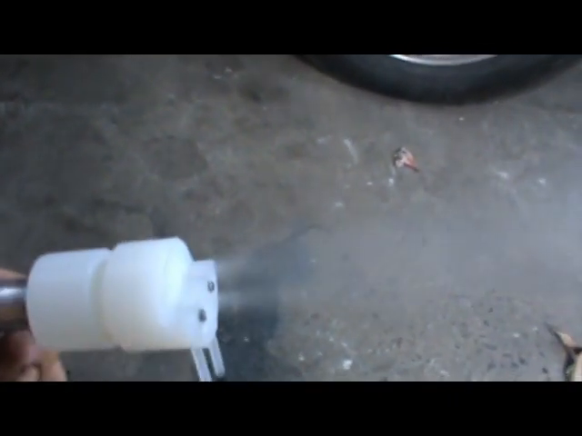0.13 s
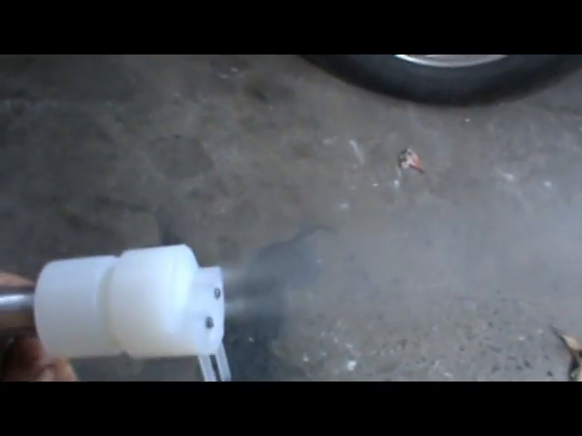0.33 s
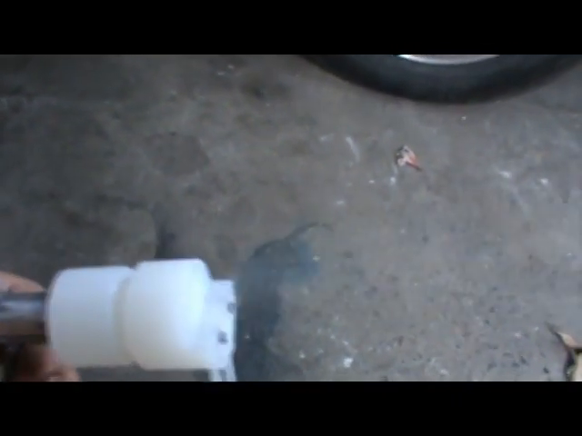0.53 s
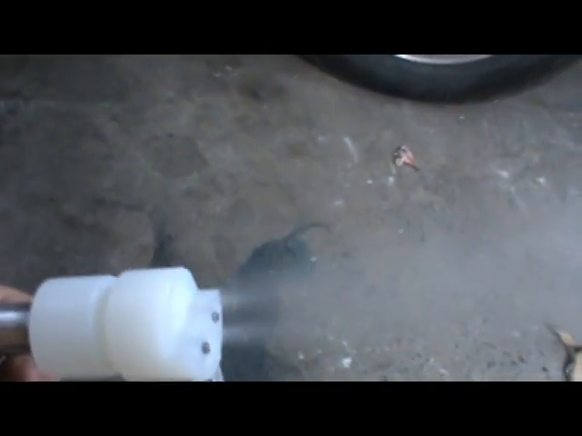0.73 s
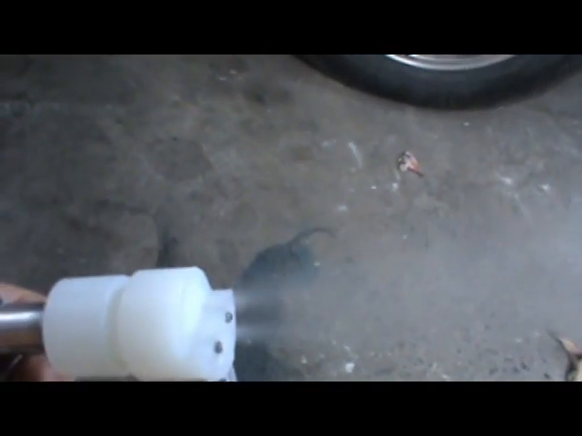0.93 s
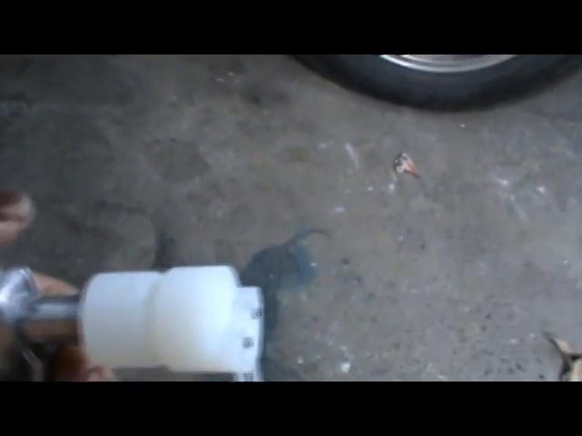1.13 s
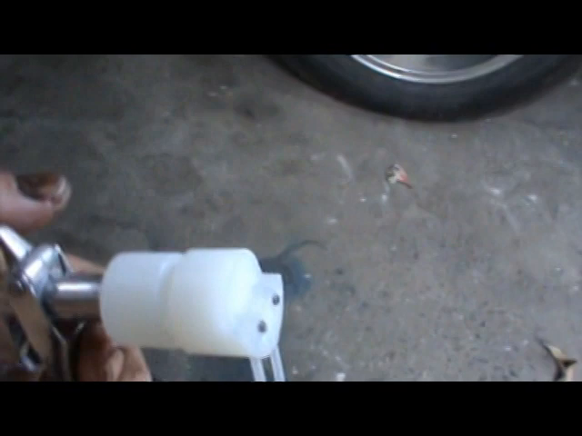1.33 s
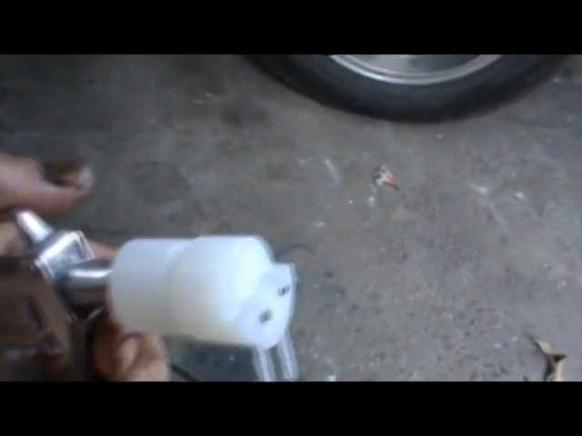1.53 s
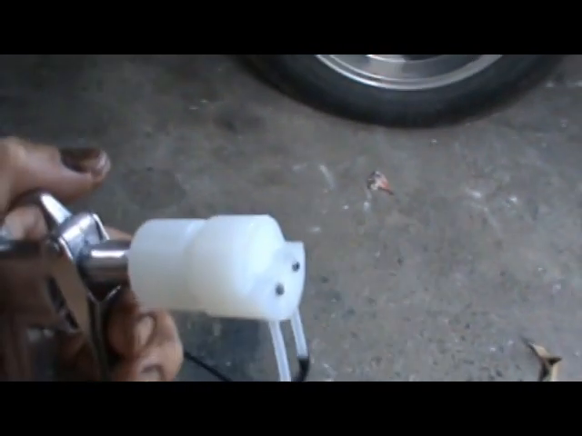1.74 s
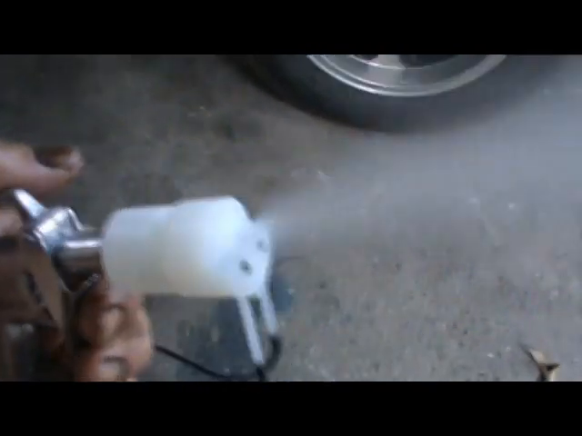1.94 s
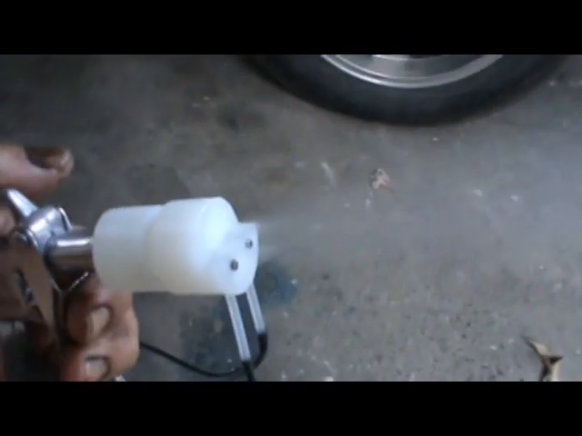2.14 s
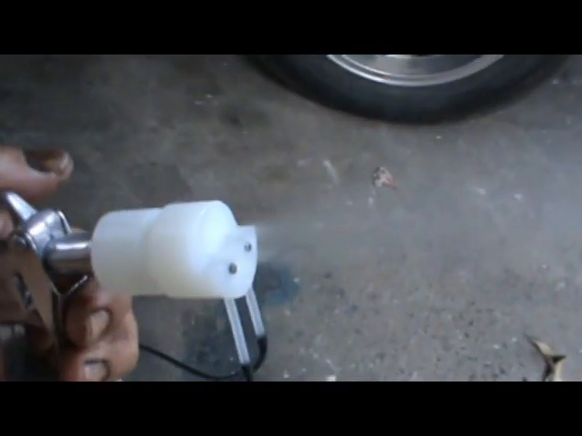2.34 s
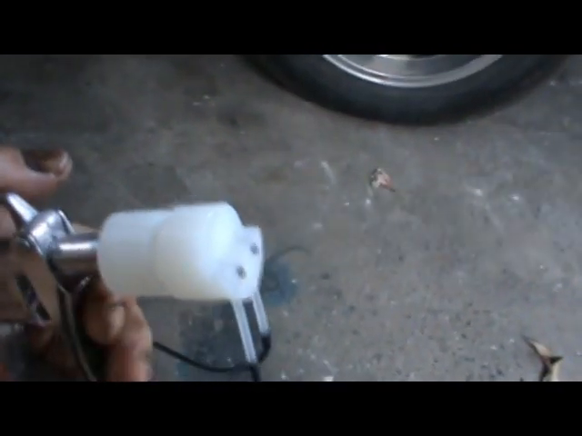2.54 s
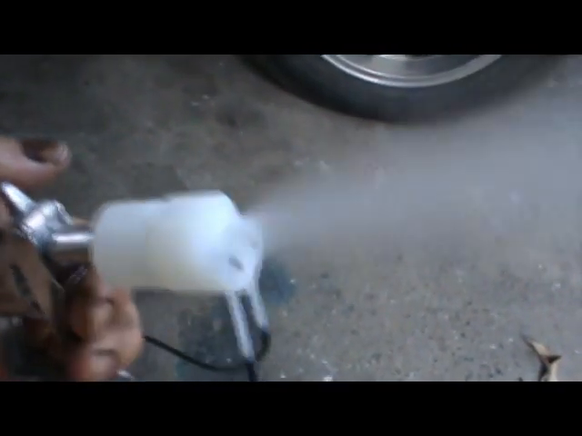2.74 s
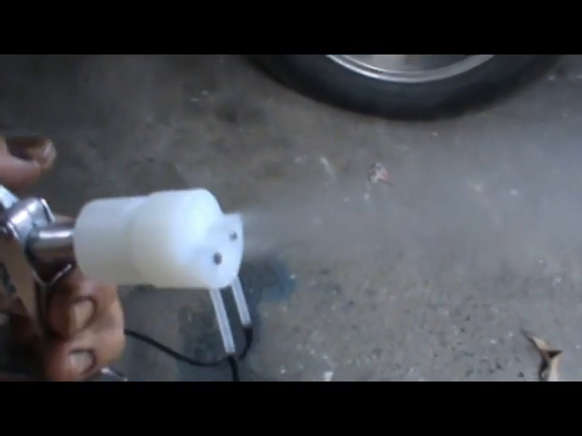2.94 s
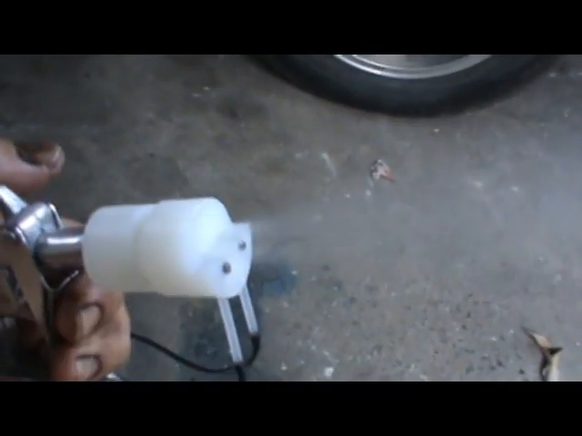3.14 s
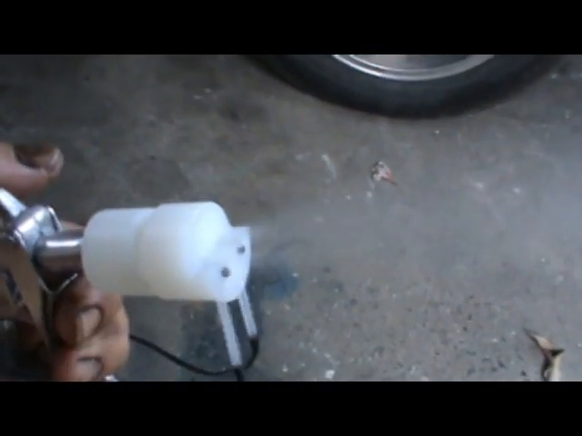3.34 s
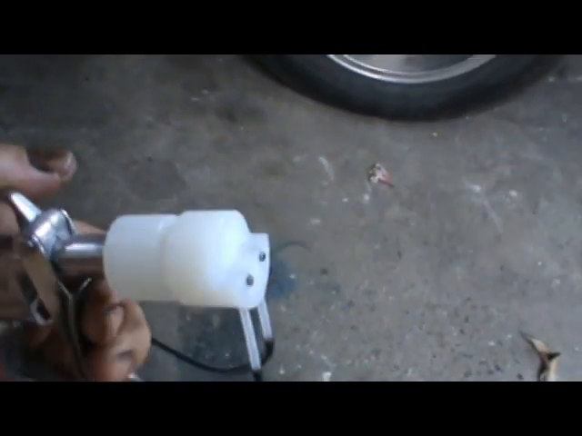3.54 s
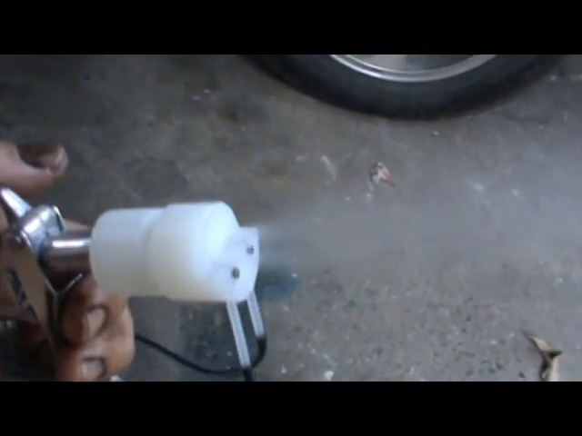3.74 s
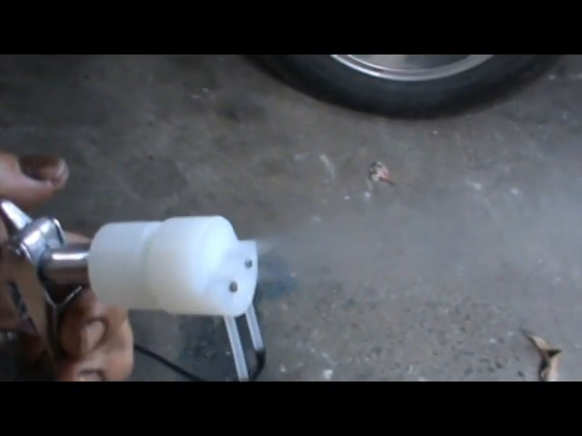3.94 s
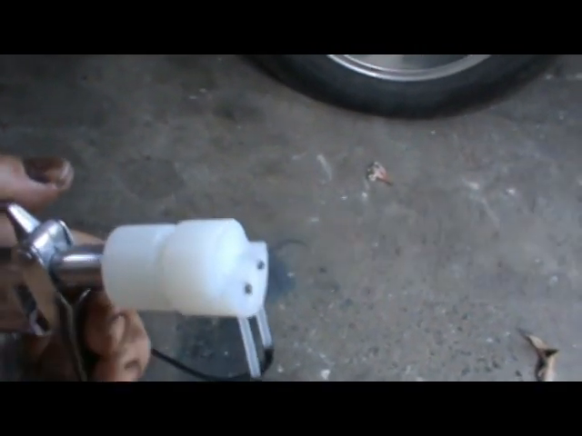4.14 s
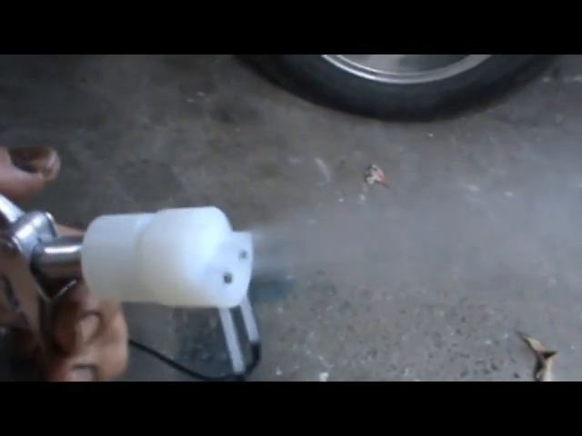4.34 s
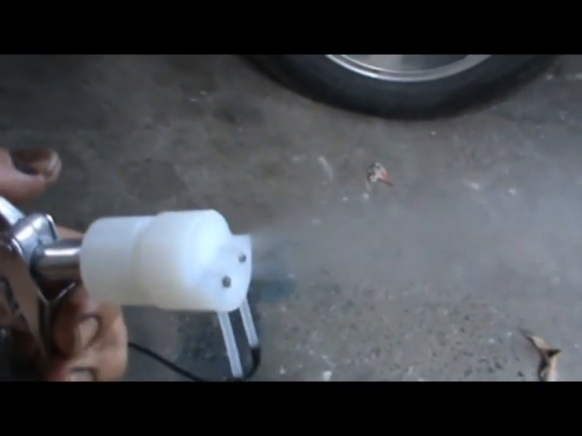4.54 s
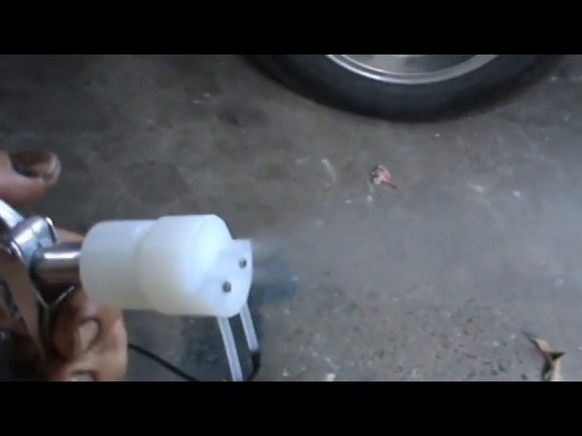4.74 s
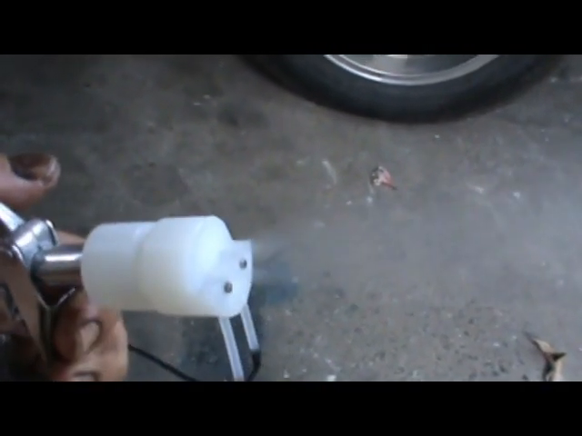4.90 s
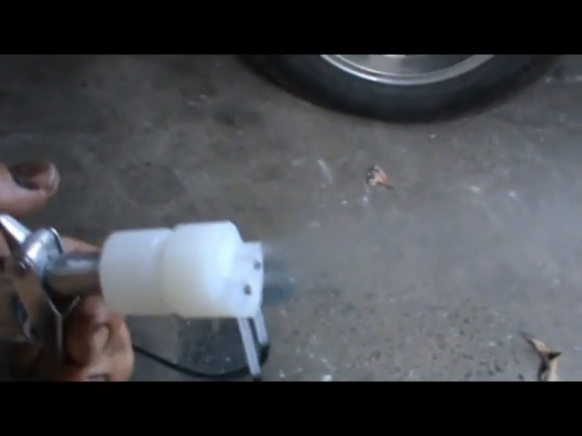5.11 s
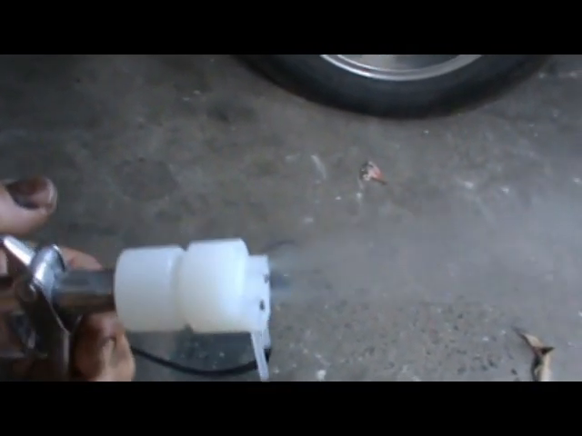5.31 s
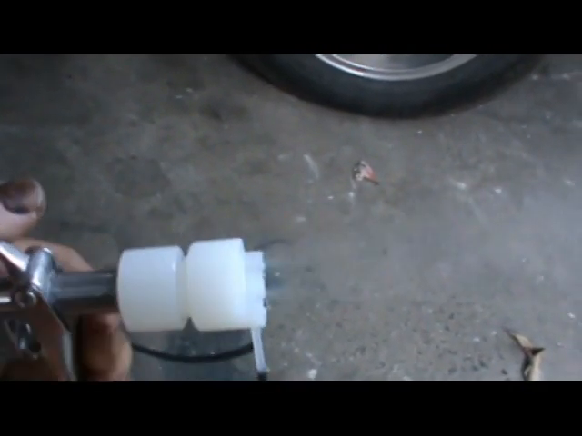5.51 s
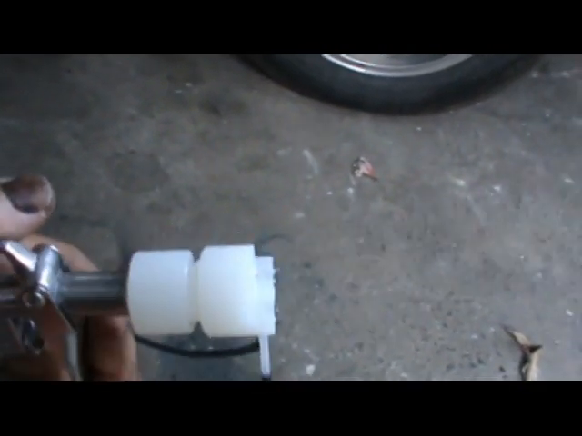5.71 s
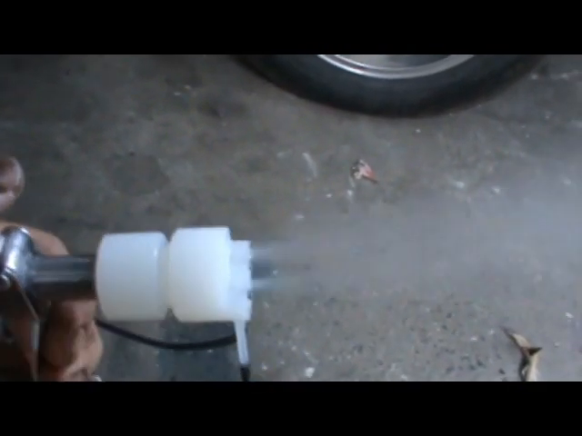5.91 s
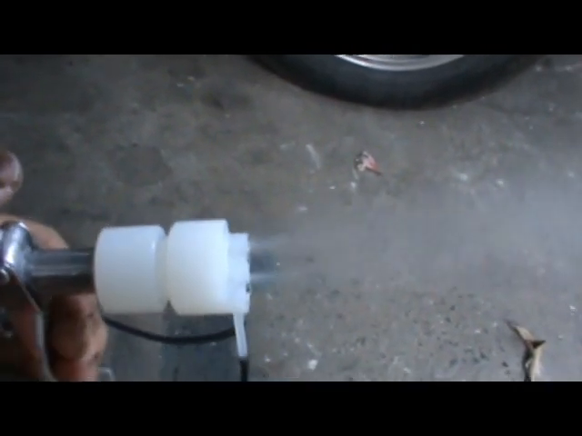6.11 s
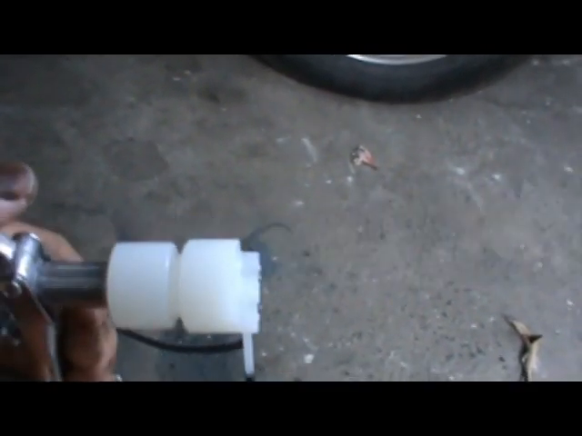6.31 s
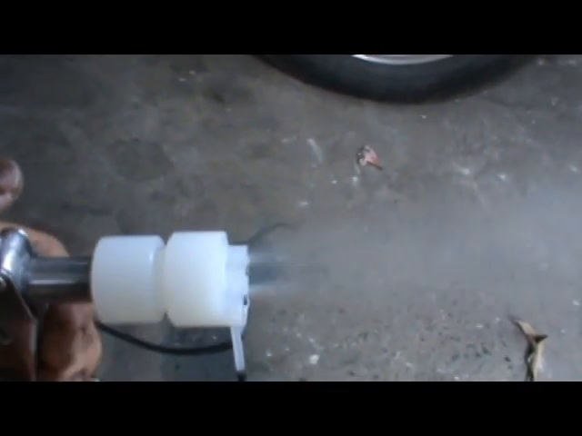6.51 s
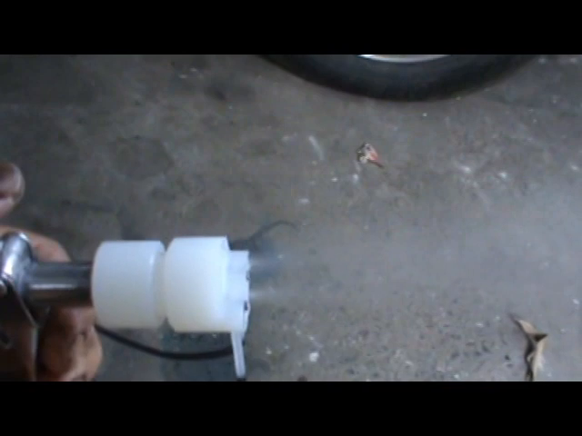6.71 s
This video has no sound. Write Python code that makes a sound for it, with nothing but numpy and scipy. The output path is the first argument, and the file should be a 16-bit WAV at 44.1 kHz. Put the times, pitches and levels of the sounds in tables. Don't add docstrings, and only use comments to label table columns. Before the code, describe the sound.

A close spray gun hisses in eight sharp-edged bursts of varying length, each spitting as liquid arrives, over a droning compressor in a garage.

```python
import sys
import numpy as np
from scipy import signal
from scipy.fft import rfft, irfft, next_fast_len
from scipy.io import wavfile
from scipy.ndimage import uniform_filter1d, map_coordinates

SR = 44100
rng = np.random.default_rng(int(sys.argv[2]) if len(sys.argv) > 2 else 0)


def waveform_to_disk(signal):
    frames = np.transpose(np.atleast_2d(signal))
    scaled = np.clip(frames, -1, 1) * 32767
    samples = np.round(scaled).astype(np.int16)
    wavfile.write(sys.argv[1], SR, samples)


def convert_level_to_amplitude(level_db):
    exponent = np.asarray(level_db, float) / 20
    return 10 ** exponent


N = 302526


def unit(x):
    return x / np.sqrt(np.mean(x ** 2) + 1e-20)


def along(points, hz):
    f, v = np.transpose(points)
    return np.interp(np.log(hz + 1), np.log(f + 1), v)


def curves(rows):
    s, *columns = np.transpose(rows)
    return [np.interp(np.arange(N) / SR, s, column) for column in columns]


def wobble(rate):
    knots = rng.standard_normal(int(N * rate / SR) + 4)
    return map_coordinates(knots, [np.arange(N) * rate / SR])


def filtered(x, response):
    m = next_fast_len(N + 8192)
    return irfft(rfft(x, m) * response(np.fft.rfftfreq(m, 1 / SR)), m)[..., :N]


def resonance(hz, centre_hz, width_hz):
    return 1j * hz * width_hz / (centre_hz ** 2 - hz * hz + 1j * hz * width_hz)


def since(times):
    t = np.arange(N) / SR
    last = np.clip(np.searchsorted(times, t) - 1, 0, None)
    return last, np.abs(t - np.asarray(times)[last])


# (frequency [Hz], lead [rad])
PORT_LEAD = [(40, 0), (300, 0.98), (520, 1.33), (800, 0.64), (1500, 0.75), (2100, 0), (4600, 0.3),
             (7000, 0.15), (10000, 0.096)]


def rush(shape, alike, left, patchy_db):
    z = signal.stft(rng.standard_normal((2, N)), nperseg=512)[2]
    field = uniform_filter1d(rng.standard_normal(z.shape[1:]), size=8, axis=0)
    field = uniform_filter1d(field, size=6, axis=1)
    pair = signal.istft(z * convert_level_to_amplitude(patchy_db * unit(field)), nperseg=512)[1][:, :N]

    def shared_and_opposed(hz):
        turn = np.arccos(np.clip(along(alike, hz), -1, 1)) / 2
        return shape(hz) * [np.cos(turn), np.sin(turn)]

    def port_balance(hz):
        half = convert_level_to_amplitude(along(left, hz) / 2) * np.exp(.5j * along(PORT_LEAD, hz))
        return np.array([half, 1 / half])

    mid, side = filtered(pair, shared_and_opposed)
    return unit(filtered(np.array([mid + side, mid - side]), port_balance))


# (opening [s], shutting [s], opening time [s], shutting time [s], jolt to the gain control [dB])
TRIGGER_PULLS = [
    (-.05, 0.437, .004, 0.0022, 7),
    (0.577, 1.119, 0.003, 0.0047, 7.5),
    (1.856, 2.566, 0.023, 0.0065, 7),
    (2.741, 3.48, 0.0039, 0.0042, 7),
    (3.626, 4.14, 0.0042, 0.0039, 5),
    (4.259, 5.584, 0.0033, 0.0055, 5.5),
    (5.807, 6.217, 0.0018, .003, 6),
    (6.379, 7, .0016, .003, 6),
]


def valve():
    t = np.arange(N) / SR
    step = lambda s, width: .5 + .5 * np.tanh((t - s) / width)
    return sum(step(on, rise) * (1 - step(off, fall)) for on, off, rise, fall, _ in TRIGGER_PULLS)


def ducking():
    garage_db, cut_under_jet_db = -37.5, 3.5
    react_s, react_rises, glide_s = .012, 1.35, 0.031
    quick_share, quick_s, slow_s = 0.59, 0.067, 0.84
    on, _, rise, _, jolt_db = np.transpose(TRIGGER_PULLS)
    pull, after = since(on + react_s + react_rises * rise)
    wearing = quick_share * np.exp(-after / quick_s) + (1 - quick_share) * np.exp(-after / slow_s)
    noticed = after < since(on)[1]
    cut_db = cut_under_jet_db * valve() * noticed + jolt_db[pull] * wearing
    return convert_level_to_amplitude(garage_db - uniform_filter1d(cut_db, size=int(glide_s * SR)))


# (time [s], strokes per second [Hz])
STROKE_RATE = [(0, 43.19), (1.6, 43.18), (2.2, 43.22), (3.2, 43.07), (4.5, 43.04), (6.86, 43.07)]
# (multiple of the speed, left level [dB], right level [dB])
STROKE_HARMONICS = [(1, -18, -17.5), (2, -13, -15.5), (3.04, -22.5, -22), (3.99, -20.5, -21),
                    (5, -12, -12.5), (6, -12.5, -13.5), (7, -2.5, -4), (8, -14, -16.5), (8.994, -20, -24.5),
                    (10, -13.5, -15.5), (10.95, -22, -22.5), (11.97, -15.5, -22.5), (13.02, -17.5, -20),
                    (14.01, -22, -17), (15, -13, -15.5), (16, -26.5, -20.5), (17, -23, -26),
                    (18, -19.5, -19), (19, -9.5, -28), (20, -8.5, -19), (21, -8.5, -20), (22, -28, -28),
                    (23, -11, -28), (24, -18, -32), (28, -29, -29), (29, -26, -21.5), (30, -20, -25),
                    (33, -28, -37), (35, -17.5, -23), (36, -26, -33)]
# (frequency [Hz], delay [s])
KNOCK_DELAY = [(65, .009), (110, .004), (150, -.008), (195, .0), (237, -.008), (280, .002), (330, .004),
               (370, -.004), (590, -.009), (625, .007), (670, -.004), (720, .002), (930, .002), (960, .012)]
# (frequency [Hz], density [dB per Hz])
CLATTER_SPECTRUM = [(25, -13), (45, -16), (62, -22), (105, -6), (160, -11.5), (330, -9), (480, -12.5),
                    (850, -4), (1100, -9.5), (2000, -13), (3000, -11.5), (4000, -14.5), (6000, -19.5),
                    (14000, -31)]
# (frequency [Hz], width [Hz], level [dB])
CASING_MODES = [(1840, 48, -2), (2850, 12, 7), (3100, 37, 0), (3700, 13, -1), (7400, 80, 5), (8680, 90, 4)]
# (frequency [Hz], likeness)
ROOM_COHERENCE = [(60, 0.8), (290, 1), (640, 0.26), (1400, 0.48), (3100, 0.85), (6800, 0.51), (14000, 0.91)]
# (frequency [Hz], left over right [dB])
ROOM_BALANCE = [(60, -6), (200, 0.5), (700, 3.5), (1300, 7), (2400, 4), (8000, 0)]


def compressor():
    turn = 2 * np.pi * np.cumsum(curves(STROKE_RATE)[0]) / SR - .4
    k, *level_db = np.transpose(STROKE_HARMONICS)
    k = np.round(k)
    start_hz = STROKE_RATE[0][1]
    phase = -2 * np.pi * np.cumsum(start_hz * along(KNOCK_DELAY, start_hz * (k - .5)))
    ports = convert_level_to_amplitude(level_db) * np.exp(1j * (phase + along(PORT_LEAD, 43 * k) * [[.5], [-.5]]))
    angle = np.linspace(0, 2 * np.pi, num=2049)
    waves = np.exp(1j * np.outer(k, angle))

    def played(part):
        cycle = np.real(ports * part @ waves)
        return np.array([np.interp(turn % (2 * np.pi), angle, side) for side in cycle])

    drone = convert_level_to_amplitude(0.27 * wobble(11)) * played(k < 16)
    drone = drone + convert_level_to_amplitude(0.89 * wobble(15)) * played(k >= 16)

    def clatter_shape(hz):
        rings = 1 + sum(convert_level_to_amplitude(db) * abs(resonance(hz, c, w)) ** 2 for c, w, db in CASING_MODES)
        return convert_level_to_amplitude(along(CLATTER_SPECTRUM, hz)) * rings

    clatter = rush(clatter_shape, ROOM_COHERENCE, ROOM_BALANCE, patchy_db=0.5)
    return convert_level_to_amplitude(7.5) * drone + convert_level_to_amplitude(1.8 + 0.64 * np.cos(turn - .6)) * clatter


# (frequency [Hz], t60 [s])
GARAGE_T60 = [(1000, 0.21), (5000, 0.43), (12000, 0.33)]


def garage(x):
    hz, t, z = signal.stft(rng.standard_normal((2, SR // 2)), SR, nperseg=256)
    decay = convert_level_to_amplitude(-60 * t / along(GARAGE_T60, hz)[:, None])
    both, apart = signal.istft(z * decay, SR, nperseg=256)[1]
    tails = np.array([both + 0.36 * apart, both - 0.26 * apart]) / np.linalg.norm(both)
    return signal.fftconvolve(x, tails, axes=1)[:, :N]


# (time [s], level [dB])
VALVE_LEAK = [(1.66, -86), (1.705, -56), (1.72, -42), (1.76, -41), (1.82, -43), (1.9, -37), (1.95, -84)]
# (frequency [Hz], likeness)
JET_COHERENCE = [(1500, 0.98), (3100, 1), (6800, 0.85), (9000, 0.86), (12000, 0.97)]
# (frequency [Hz], left over right [dB])
JET_BALANCE = [(1500, 0.5), (4400, -2), (8100, 4), (10000, 3.5), (12000, 2)]


def leak():
    t = np.arange(N) / SR
    before = sum(np.exp(-((t - on + 0.003) / 0.0067) ** 2) for on, *_ in TRIGGER_PULLS)

    def whistle(hz):
        return 1 / (1 + ((hz - 9200) / 800) ** 6) + .08 * abs(resonance(hz, 13000, 2500)) ** 2

    level = convert_level_to_amplitude(curves(VALVE_LEAK)[0]) + convert_level_to_amplitude(-38.0) * before
    return level * rush(whistle, JET_COHERENCE, JET_BALANCE, patchy_db=-1.0)


# (time [s], peak level [dB], first pitch [Hz], later brightness [dB], length [s])
LIQUID_SPITS = [
    (0.013, -27.5, 2600, 9, 0.063),
    (0.621, -28.5, 2940, 8, 0.057),
    (1.991, -28.5, 2770, 0, 0.094),
    (2.797, -31, 2780, -1, 0.064),
    (3.681, -26, 2300, 1, 0.028),
    (4.304, -31.5, 2930, 4, 0.1),
    (5.8755, -24, 2610, 1, 0.057),
    (6.429, -25.5, 2460, 6, 0.063),
]


def spits():
    out, t = np.zeros(N + SR), np.arange(SR // 4) / SR
    hz = np.fft.rfftfreq(len(t), 1 / SR)
    # (delay [lengths], multiple of first pitch, level [dB])
    stages = ((0, 0.99, 1), (.15, 0.8, -4.5), (.35, 1.51, 2), (.55, 1.95, -9.5))
    for s, db, start_hz, bright_db, length in LIQUID_SPITS:
        start = round((s - .003) * SR)
        for delay, pitch, gain_db in stages:
            v = np.clip(t / length - delay, 0, None)
            cavity = resonance(hz, pitch * start_hz, .45 * pitch * start_hz) ** 2
            air = unit(irfft(rfft(rng.standard_normal(len(t))) * cavity, len(t)))
            puff = (1 - np.exp(-v * 25)) * np.exp(-v * 2.6)
            out[start:][:len(t)] += convert_level_to_amplitude(db + gain_db + delay * bright_db - 6.0) * puff * air
    return out[:N] * convert_level_to_amplitude([[.2], [-.2]])


def mist_db():
    dry_db, wet_db = -7, -6.5
    surge_db, surge_s, wetting_s = 2.5, 0.2, 0.0075
    after = since([s for s, *_ in LIQUID_SPITS])[1]
    wet = after < since([on for on, *_ in TRIGGER_PULLS])[1]
    level_db = np.where(wet, wet_db + surge_db * np.exp(-after / surge_s), dry_db)
    return uniform_filter1d(level_db, size=int(wetting_s * SR))


# (frequency [Hz], density [dB per Hz])
FIZZ_SPECTRUM = [(3530, -30), (6000, -2), (7820, -6.5), (9090, -1), (11800, -0.5), (13900, -4.5),
                 (14700, -12.5), (15400, -21)]
# (frequency [Hz], density [dB per Hz])
BODY_SPECTRUM = [(760, -28), (1300, -11.5), (1400, -13.5), (2010, -7), (2300, -8), (2720, -7), (4320, -1),
                 (8000, 1.5), (10400, -1.5), (17600, -120)]


def jet():
    opened_s = since([on for on, *_ in TRIGGER_PULLS])[1]
    burst_db = 1 * np.exp(-opened_s / .015)
    flutter_db = .15 * wobble(25) + 1.0 * wobble(400)

    def fizz_shape(hz):
        return convert_level_to_amplitude(along(FIZZ_SPECTRUM, hz)) * hz ** 2 / (hz ** 2 + 7000 ** 2)

    def body_shape(hz):
        return convert_level_to_amplitude(along(BODY_SPECTRUM, hz)) / (1 + (hz / 7000) ** 2)

    fizz = rush(fizz_shape, JET_COHERENCE, JET_BALANCE, patchy_db=0.0)
    body = rush(body_shape, JET_COHERENCE, JET_BALANCE, patchy_db=0.78)
    mixed = convert_level_to_amplitude(1.0) * fizz + convert_level_to_amplitude(mist_db() + 1.1) * body
    return valve() * convert_level_to_amplitude(-28 + burst_db + flutter_db) * mixed


def scene():
    gun = jet() + spits() + leak()
    return gun + convert_level_to_amplitude(-12.5) * garage(gun) + ducking() * compressor()


def roll_off(x):
    return signal.sosfilt(signal.butter(12, 15590, fs=SR, output="sos"), x)


# (lowest [Hz], highest [Hz])
MONO_TREBLE = (11600, 13700)
# (lowest [Hz], highest [Hz], least level [dB])
GATED_BANDS = [(13780, 14640, -60), (14640, 14980, -51), (14980, 15270, -56.5), (15270, 22050, 0)]


def record(dry):
    hz, t, z = signal.stft(dry, SR, "cosine", nperseg=2048)
    treble = (hz > MONO_TREBLE[0]) & (hz < MONO_TREBLE[1])
    z[:, treble] = z[:, treble].mean(axis=0)
    for lo_hz, hi_hz, least_db in GATED_BANDS:
        band = (hz >= lo_hz) & (hz <= hi_hz)
        level = np.sqrt(np.sum(abs(z[:, band]) ** 2, axis=(0, 1)))
        z[:, band] *= level > convert_level_to_amplitude(least_db)
    kept = signal.istft(z, SR, "cosine", nperseg=2048)[1][:, :N]
    return roll_off(kept)


dry = scene()
out = record(dry)
waveform_to_disk(out)
```